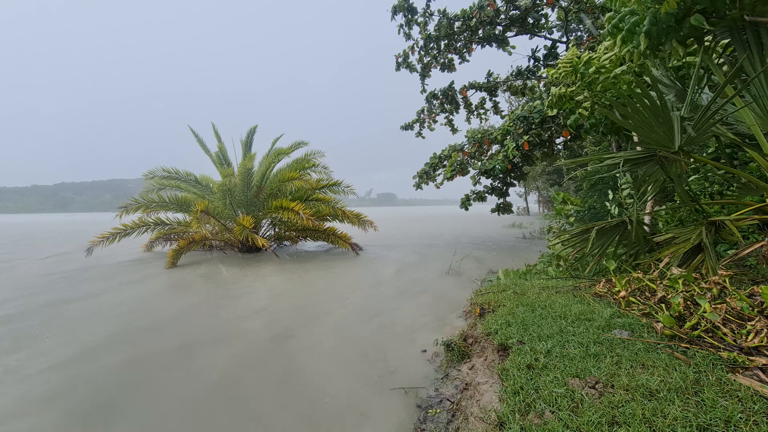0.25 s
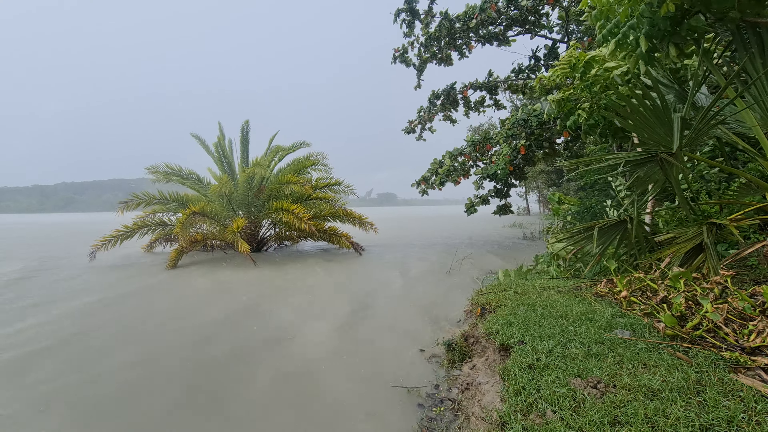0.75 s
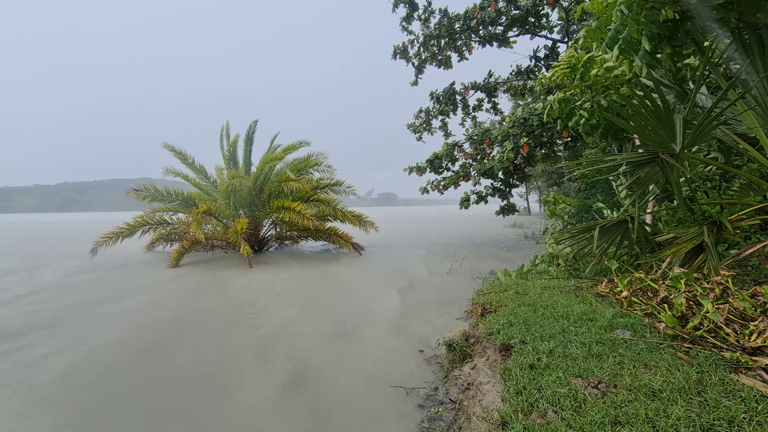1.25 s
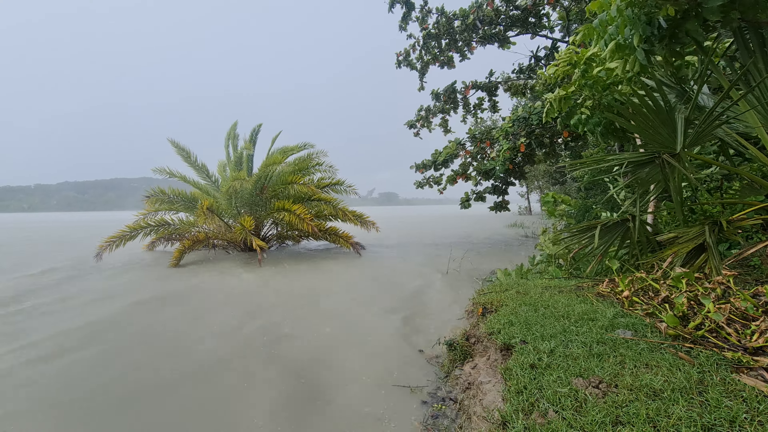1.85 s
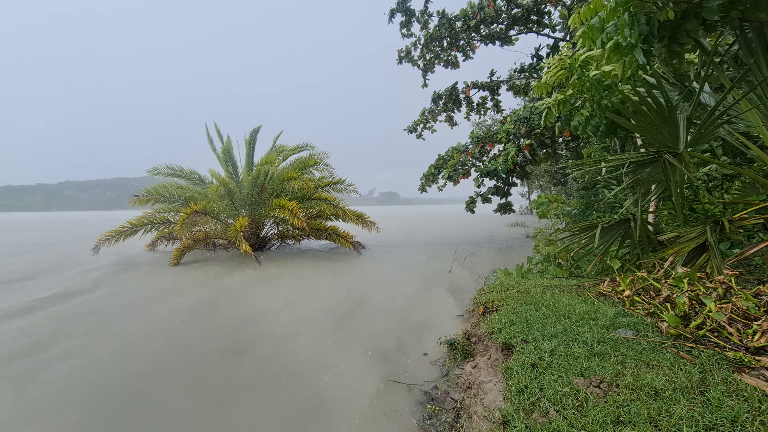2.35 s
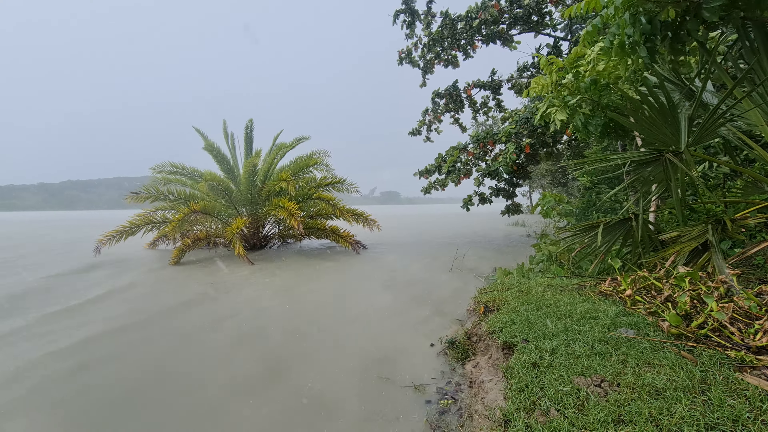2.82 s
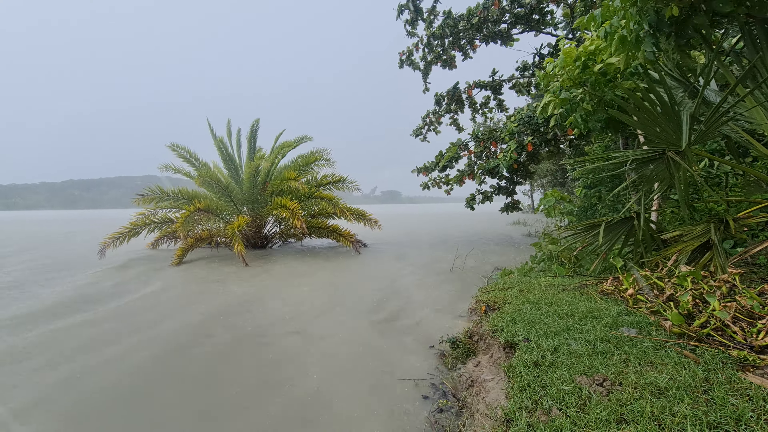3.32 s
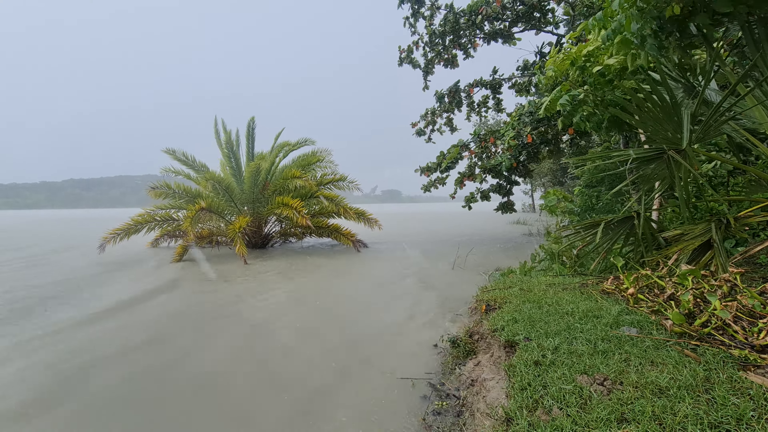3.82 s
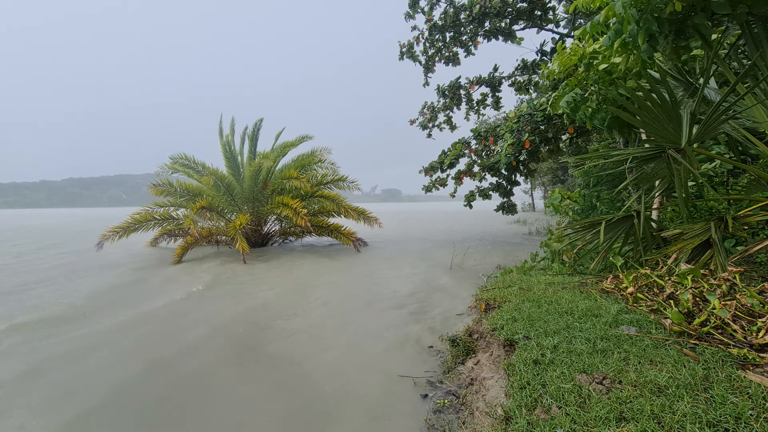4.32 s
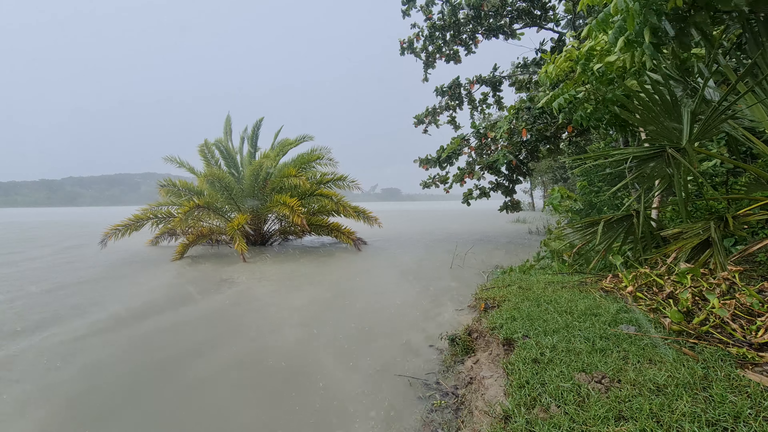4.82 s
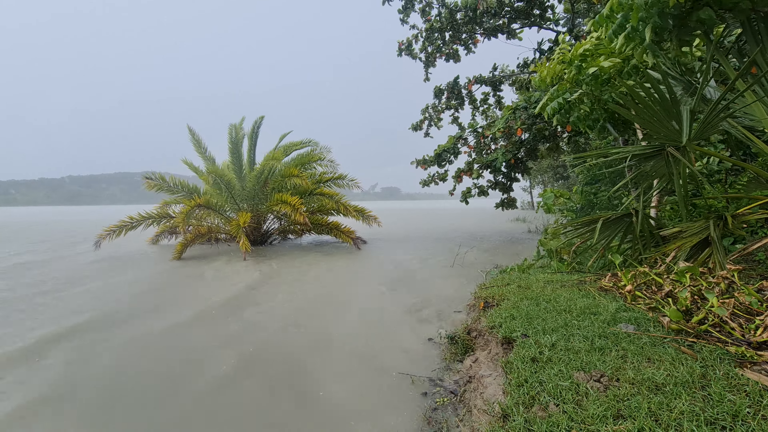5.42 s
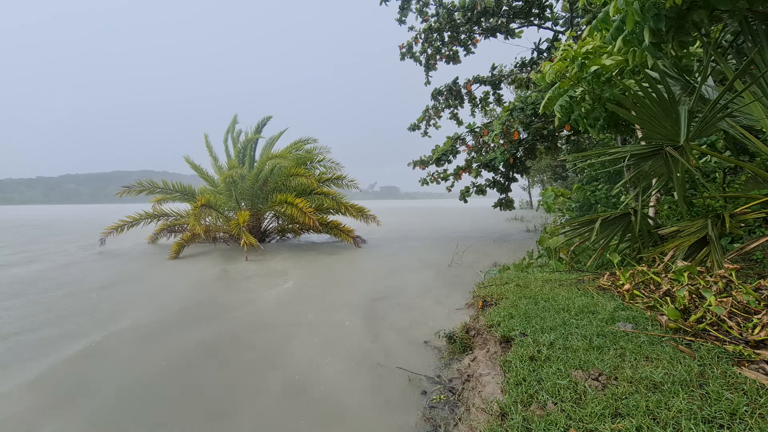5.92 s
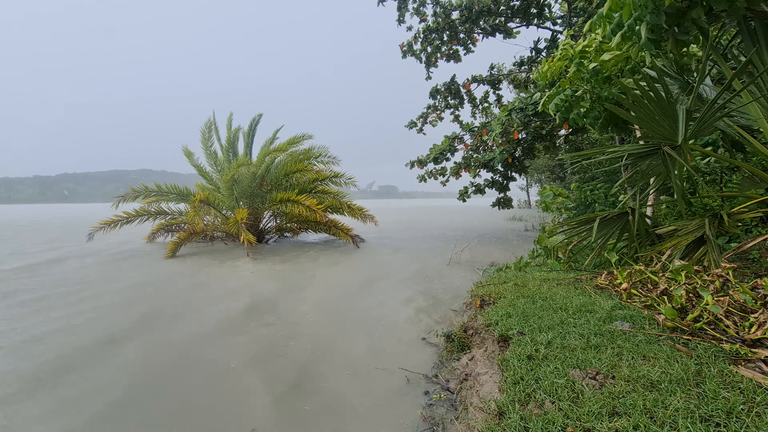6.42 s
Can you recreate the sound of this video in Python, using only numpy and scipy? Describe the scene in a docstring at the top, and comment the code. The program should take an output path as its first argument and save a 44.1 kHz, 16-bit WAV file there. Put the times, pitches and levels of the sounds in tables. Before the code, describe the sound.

Outdoors on a riverbank, rain makes a continuous wash on the water and a light patter on nearby foliage. Wind strikes the microphone in irregular puffs, adding a low rumble and flutter that swells and fades. Now and then a fat drop taps very close, with small runs of ticks near the start, in the middle and a little later, while the shower stays even.

```python
"""Steady rain hisses and patters on a wide river and the bushes of its bank, over a low wind rumble.
Far drops merge into a wash, nearer ones patter on leaves and water, and a few tick right
beside the microphone. The uneven rumble comes from eddies (swirls of air) that strike
the microphone's two openings, its left and right ports."""
import sys
import numpy as np
from scipy import signal
from scipy.fft import rfft, irfft
from scipy.io import wavfile
from scipy.ndimage import uniform_filter1d

SR = 44100
rng = np.random.default_rng(int(sys.argv[2]) if len(sys.argv) > 2 else 0)


def unload_audio(sound):
    """Save the sound as a 16-bit wav file, at the path given as the first command line argument."""
    columns = np.transpose(np.atleast_2d(sound))
    # keep every value between -1 and 1, then stretch to whole-number steps
    steps = np.round(np.clip(columns, -1, 1) * 32767)
    wavfile.write(sys.argv[1], SR, steps.astype(np.int16))


N = 293690
TIME = np.arange(N) / SR


def gain_of(db):
    """Turns decibels into a number to multiply a sound by."""
    return 10 ** (np.asarray(db) / 20)


def unit_rms(x):
    """Scales a signal so that its average size (rms) is 1."""
    return x / np.sqrt(np.mean(x ** 2) + 1e-20)


def at_freq(rows, hz, column=1):
    """Reads a table between its rows, on a logarithmic frequency scale."""
    table = np.transpose(rows)
    return np.interp(np.log(hz + 1), np.log(table[0] + 1), table[column])


def at_time(rows, t, column=1):
    """Reads a table between its rows, at the times t."""
    table = np.transpose(rows)
    return np.interp(t, table[0], table[column])


def add(mix, start_s, sound):
    """Mixes a stereo sound in at the given time."""
    part = mix[:, max(round(start_s * SR), 0):][:, :sound.shape[1]]
    part += sound[:, :part.shape[1]]


def to_spectra(x):
    """Splits sound into short slices; returns frequencies, times and each slice's spectrum."""
    return signal.stft(x, SR, nperseg=1024, noverlap=768)


def to_sound(spectra):
    """Joins the slices back into sound."""
    return signal.istft(spectra, SR, nperseg=1024, noverlap=768)[1][:, :N]


def tick(t, hz, cycles):
    """A hit at t = 0: a steep push, then a cycle or two of fading ringing."""
    turns = t * hz
    decay = np.where(turns < 0, (turns / (0.71 * cycles)) ** 2, turns / cycles)
    return np.cos(2 * np.pi * turns) * np.exp(-decay)


def plip(t, hz, cycles):
    """A soft hit at t = 0: a short ring that rises faster than it dies."""
    turns = t * hz
    width = cycles * np.where(turns < 0, .85, 1.25)
    return np.sin(2 * np.pi * turns + np.pi / 3) * np.exp(-(turns / width) ** 2)


def wind_strength():
    """Rumble and flutter levels in dB: each gust swells and dies away on top of a breeze."""
    # the light wind between gusts: t/s, relative rumble level/dB
    breeze = [(0, -35), (.7, -32.5), (.95, -38.5), (1.3, -33), (2.1, -35.5), (2.85, -32.5), (3.1, -42),
              (3.7, -34.5), (4.05, -37.5), (5.25, -30), (5.8, -33.5), (6.66, -28.5)]
    # gusts: peak t/s, length/s, relative rumble level/dB, relative flutter level/dB
    gusts = [(.04, 0.2, -27, -29), (.25, 0.21, -29, -38), (1.183, 0.12, -25.5, -39),
             (1.354, 0.12, -31.5, -35), (1.734, 0.14, -27, -34.5), (2.327, 0.064, -41, -36.5),
             (2.447, 0.11, -27.5, -40.5), (3.287, 0.06, -25.5, -45), (3.404, 0.041, -28, -44),
             (3.585, 0.075, -25, -39), (4.264, 0.15, -27, -39.5), (4.553, .12, -26, -48),
             (5.42, .24, -30.5, -40.5), (5.625, 0.069, -26, -34.5), (6.175, .09, -34, -35.5),
             (6.35, 0.11, -30, -39), (6.587, 0.24, -33, -40)]
    rise_share = 0.59  # part of a gust spent building up
    breeze_db = at_time(breeze, TIME)
    power = gain_of([breeze_db, breeze_db - 13]) ** 2  # a breeze flutters less than it rumbles
    for peak_s, length_s, rumble_db, flutter_db in gusts:
        width = length_s * np.where(TIME < peak_s, rise_share, 1 - rise_share)
        power += gain_of([[rumble_db], [flutter_db]]) ** 2 * np.exp(-((TIME - peak_s) / width) ** 2)
    return 10 * np.log10(power)


def puffs():
    """A random wobble: the wind breaks into puffs, some ten a second."""
    rates_hz = np.geomspace(5, 20, num=24)
    return unit_rms(sum(np.sin(2 * np.pi * (hz * TIME + rng.random())) for hz in rates_hz))


def eddies(colour, likeness, steadiness):
    """Swirling air presses on both ports, partly alike; steadiness evens out its strength."""
    shape = gain_of(at_freq(colour, np.fft.rfftfreq(N, 1 / SR)))
    left, other = rfft(rng.standard_normal((2, N))) * shape
    right = likeness * left + np.sqrt(1 - likeness ** 2) * other
    pressure = irfft(np.array([left, right]), N)
    power = uniform_filter1d(abs(signal.hilbert(pressure.mean(0))) ** 2, size=3500)
    return unit_rms(pressure / power ** (steadiness / 2))


def buffets():
    """Single compact eddies pass both ports, each as one short thump of pressure."""
    # the thumps: t/s, peak level/dB, f/Hz
    thumps = [(.398, -18, 90), (0.55, -21, 71.6), (1.189, -28, 66), (1.766, -12, 103), (1.989, -21, 62),
              (2.219, -17.5, 70), (2.443, -14, 94), (2.596, -18, 80.6), (2.951, -21, 85),
              (3.574, -20.5, 67), (5.913, -19.5, 72), (6.286, -15, 80), (6.335, -18.5, 82),
              (6.514, -21, 72)]
    out, lead_s = np.zeros((2, N)), .03
    t = np.arange(0, .1, 1 / SR) - lead_s
    for peak_s, db, hz in thumps:
        skew_s = rng.uniform(-0.00048, 0.00061)  # one port is hit first
        add(out, peak_s - lead_s, gain_of(db) * tick(np.array([t - skew_s, t + skew_s]), hz, cycles=0.6))
    return out


def wind():
    """Large eddies rumble; the harder gusts shed small ones that flutter above them in puffs."""
    # tone of the large, small and finest eddies: f/Hz, relative level/dB
    rumble_colour = [(10, -28), (25, -14.5), (40, -7.5), (55, 1.5), (68, 3.5), (85, -0.5), (110, -7),
                     (150, -18.5), (250, -55.5)]
    flutter_colour = [(70, -27), (120, -1), (160, 0), (210, -3), (290, -13.5), (400, -26), (800, -58)]
    tearing_colour = [(120, -19), (220, 2), (330, 6), (470, -6), (800, -29.5)]
    rumble_db, flutter_db = wind_strength()
    rumble_puffs, puff_likeness = puffs(), 0.47
    flutter_puffs = puff_likeness * rumble_puffs + np.sqrt(1 - puff_likeness ** 2) * puffs()
    rumble_db = rumble_db + 2.6 * rumble_puffs
    flutter_db = flutter_db + 2.2 * flutter_puffs
    rumble = eddies(rumble_colour, likeness=0.36, steadiness=0.66) * gain_of(rumble_db + 0.75)
    flutter = eddies(flutter_colour, likeness=0.1, steadiness=0.69) * gain_of(flutter_db + 2.5)
    # the finest eddies grow faster than the gust, so hard gusts sound brighter
    tearing = eddies(tearing_colour, likeness=-0.39, steadiness=0.57) * gain_of(1.313 * flutter_db + 4.5)
    return rumble + flutter + tearing + buffets()


def patter(per_s_per_pitch, db_per_size, max_size):
    """Countless small drops, mostly faint, land at random in two separate channels."""
    out, t = np.zeros((2, N)), np.arange(-128, 384) / SR
    for hz in np.geomspace(900, 12000, num=24):
        lands = rng.random((2, N)) < per_s_per_pitch / SR
        size = np.minimum(rng.exponential(1, (2, N)), max_size)
        hits = lands * gain_of(db_per_size * size) * rng.choice([-1, 1], (2, N))
        drop = tick(t, hz, cycles=rng.uniform(0.48, 1.1))
        out += signal.oaconvolve(hits, np.sqrt(hz) * unit_rms(drop)[None], "same", axes=1)
    # make all frequencies equally strong on average
    spectrum = rfft(out)
    power = uniform_filter1d((abs(spectrum) ** 2).mean(0), size=2001)
    return unit_rms(irfft(spectrum / np.sqrt(power + 1e-9), N))


def rain():
    """Far wash and nearer patter swell together as the shower drifts over river and leaves."""
    # tone of the rain: f/Hz, relative left level/dB, relative right level/dB
    colour = [(170, -10, -10.5), (426, -7.4, -5), (610, -6, -2), (810, -3, -2), (960, -8.5, -6),
              (1290, 0, 0.6), (2090, -4.5, -3.5), (3160, -5.5, -3), (5200, -10, -10.5), (6910, -10.5, -8.5),
              (7860, -13, -18.5), (8600, -13.5, -21), (9270, -23, -20), (15400, -18, -18)]
    # how the ports share the rain: f/Hz, likeness (0 to 1), phase lead of the left/rad
    ports = [(250, 0.37, -2.5), (440, 0.3, -2.5), (564, 0.68, -1.5), (810, 0.5, -3), (1480, 0.75, -3),
             (1780, 0.21, -3.5), (2330, 0.15, -4.5), (3460, 0.11, -3.5), (5500, 0.08, 1.5)]
    # strength of the shower: t/s, relative level on leaves/dB, relative level on the river/dB
    shower = [(0.0, -40.0, -45.5), (0.4, -39.0, -48.5), (1.45, -39.5, -48.5), (2.3, -37.0, -45),
              (2.9, -38.0, -46.0), (3.4, -37.5, -44), (3.95, -39, -47), (4.45, -39.0, -47),
              (4.8, -36, -46.5), (5.25, -38.0, -45.5), (5.65, -40, -48), (5.95, -39.0, -47.5),
              (6.3, -40.5, -48), (6.66, -39.5, -49.0)]
    # single drops stand out most in the middle range: f/Hz, share of the power (0 to 1)
    drop_share = [(300, 0.16), (1400, 0.44), (3000, 0.19), (7000, 0.23), (13000, 0.15)]
    hz, t, wash = to_spectra(rng.standard_normal((2, N)))
    drops = to_spectra(patter(per_s_per_pitch=45, db_per_size=3.0, max_size=5.6))[2]
    share = at_freq(drop_share, hz)[:, None]
    left, right = np.sqrt(1 - share) * wash + np.sqrt(share) * drops
    # each port picks up some of the other's sound, at many pitches nearly upside down
    leak = np.arcsin(at_freq(ports, hz))[:, None] / 2
    turn = np.exp(1j * at_freq(ports, hz, column=2))[:, None]
    spectra = np.array([np.cos(leak) * left + np.sin(leak) * turn * right,
                        np.cos(leak) * right + np.sin(leak) * left / turn])
    spectra *= gain_of([at_freq(colour, hz), at_freq(colour, hz, column=2)])[:, :, None]
    # the river fills the bottom of the range, leaves the middle, spray the top
    leaves_db, river_db = at_time(shower, t), at_time(shower, t, column=2)
    spray_db = 0.67 * leaves_db
    low = at_freq([(750, 1), (1200, 0)], hz)[:, None]
    high = at_freq([(3300, 0.086), (6000, 1)], hz)[:, None]
    bands = [(low, river_db), (1 - low - high, leaves_db), (high, spray_db)]
    swell_db = sum(weight * (db - db.mean()) for weight, db in bands)
    # drops arrive in clumps: random patches, smoothed over pitch and then over time
    patches = uniform_filter1d(rng.standard_normal(left.shape), size=14, axis=0)
    clumps_db = unit_rms(uniform_filter1d(patches, size=10, axis=1))
    flicker_db = 0.27 * unit_rms(uniform_filter1d(rng.standard_normal(len(t)), size=6))
    spectra *= gain_of(swell_db + clumps_db + flicker_db)
    return gain_of(-31) * unit_rms(to_sound(spectra))


def stray_drops(per_s, faint_db, spread_db):
    """Lesser drops fall at random an arm's length away; returns rows like those of fat_drops."""
    when, chance, size, pitch, side, ring = rng.random((300, 6)).T
    db, hz = faint_db + spread_db * size ** 2, 1300 * 3.6 ** pitch
    pan_db, cycles = 24 * (side - .5), 0.34 + .5 * ring
    # higher drops are crisper and knock less
    knock_db, edge_db = -22 - 8 * pitch, -30 + 14 * pitch
    rows = np.transpose([when * N / SR, db, hz, pan_db, cycles, knock_db, edge_db])
    return rows[chance < per_s * N / SR / len(rows)]


def near_drops():
    """Drops tick beside one port; the other hears them weaker and a moment later."""
    # close drops: t/s, relative level/dB, f/Hz, left minus right/dB, ring/cycles,
    # dull knock/dB, crisp edge/dB (both relative to the drop's level)
    fat_drops = [(.2179, -9.5, 1750, -12, .45, -17, -15), (.2756, -7.5, 2300, -7, .3, -25, -28),
                 (.343, -7, 2900, -8, 0.41, -25, -26), (1.2372, -21, 3000, 3, .4, -18, 2),
                 (1.4281, -10.5, 1480, 9, .9, -24, -28), (1.5835, -15, 2120, -11, .4, -18, -1),
                 (2.5138, -7, 1510, 11, 1, -26, -28), (2.9843, -3, 2800, 12, 0.41, -20, -18),
                 (3.1883, -11.5, 1140, -3, .46, -3, -28), (3.348, -4, 1650, 19, 0.45, -23, -28),
                 (3.3863, -7.5, 3400, 13, 0.35, -1.5, -28), (3.4714, -9, 1400, 10, .84, -22, -28),
                 (3.5185, -11, 2700, -11, .5, -13, -28), (4.7591, -2.5, 1700, 14, .55, -15, -9),
                 (4.8146, -11, 2390, -16, .4, -22, -28), (4.8397, -1, 2750, 19, 0.96, -23, -28),
                 (4.8676, -10, 1700, 19, 0.67, -22, -28), (4.8939, -8, 1990, -23, .59, -28, -28),
                 (5.108, -13, 1680, 0, .68, -24, -28), (5.2034, -12, 2200, 2, 0.55, -23, -28),
                 (5.357, -10.5, 1330, 7, .5, -16, -26), (5.7428, -11, 2200, 15, 0.31, -22, -28),
                 (6.2217, -3, 1900, 7, .45, -17, -28)]
    strays = stray_drops(per_s=18, faint_db=-25, spread_db=9.0)
    out, lead_s = np.zeros((2, N)), .003
    t = np.arange(0, .03, 1 / SR) - lead_s
    port_t = np.array([t, t - .0004])  # near port, far port
    for land_s, db, hz, pan_db, cycles, knock_db, edge_db in [*fat_drops, *strays]:
        # the blow and the sharp edge of first contact
        blow = plip(port_t, hz, cycles) + gain_of(-10) * plip(port_t, hz=5300, cycles=0.97)
        edge = gain_of(edge_db) * plip(port_t, hz=12700, cycles=2.2)
        # the dull knock pushes the two ports in opposite directions
        knock = gain_of(knock_db) * plip(t, hz=455, cycles=0.67) * np.array([[1], [-.55]])
        splash = rng.standard_normal(port_t.shape) * (port_t > 0) * np.exp(-abs(port_t) / 0.0039)
        pair = (blow + edge) * gain_of([[0], [-abs(pan_db)]]) + knock + gain_of(-28) * splash
        add(out, land_s - lead_s, gain_of(db - 3.5) * (pair if pan_db > 0 else pair[::-1]))
    return out


def narrow_lows(stereo):
    """Now and then the low sounds shrink briefly to the centre between left and right."""
    # narrow moments: start t/s, end t/s, top f/Hz, change in the side level/dB
    narrowings = [(-.1, .27, 1010, -18), (.93, 1.064, 450, -11), (2.402, 2.463, 650, -18),
                  (3.62, 3.7, 500, -12), (5.07, 5.17, 750, -20), (5.588, 5.693, 750, -15),
                  (6.27, 6.33, 500, -12), (6.42, 6.51, 600, -16)]
    centre, fade_s = stereo.mean(0), .02
    hz, t, side = to_spectra(stereo - centre)
    for start_s, end_s, top_hz, side_db in narrowings:
        inside = np.clip(np.minimum(t - start_s, end_s - t) / fade_s + .5, 0, 1)
        side = side * gain_of(side_db * inside / (1 + (hz[:, None] / top_hz) ** 8))
    return centre + to_sound(side)


def scene():
    """Rain all around, close drops, and wind on the microphone."""
    return narrow_lows(rain() + near_drops() + wind())


def record(dry):
    """Cuts away the very highest treble."""
    cutoff_hz = 15950
    low_pass = signal.firwin(511, cutoff_hz, window=("kaiser", 9), fs=SR)
    return signal.oaconvolve(dry, low_pass[None], "same")


dry = scene()
out = record(dry)
unload_audio(out)
```